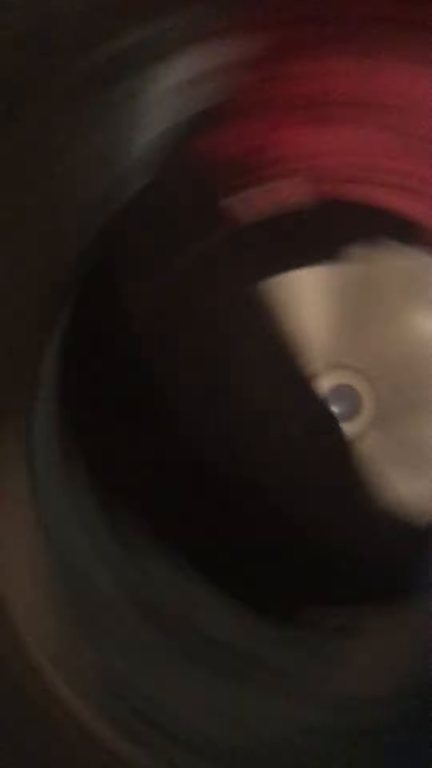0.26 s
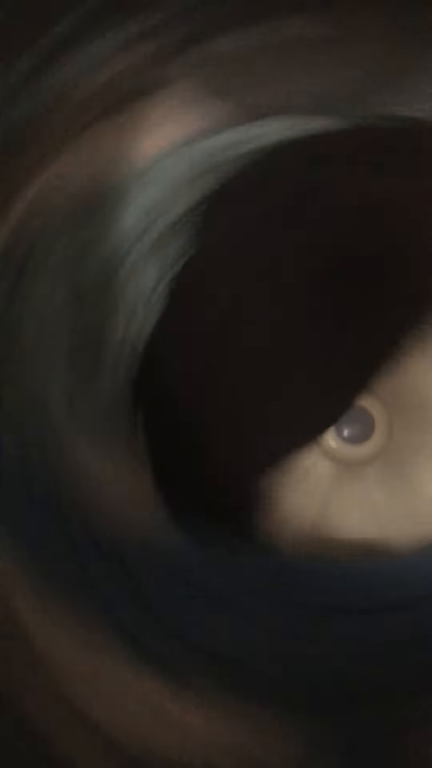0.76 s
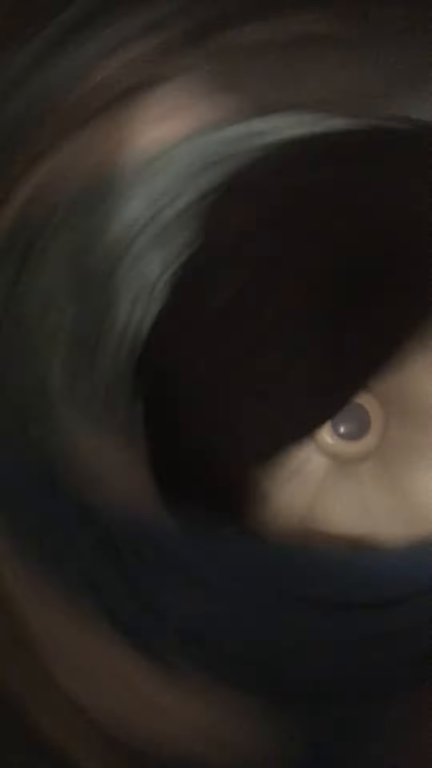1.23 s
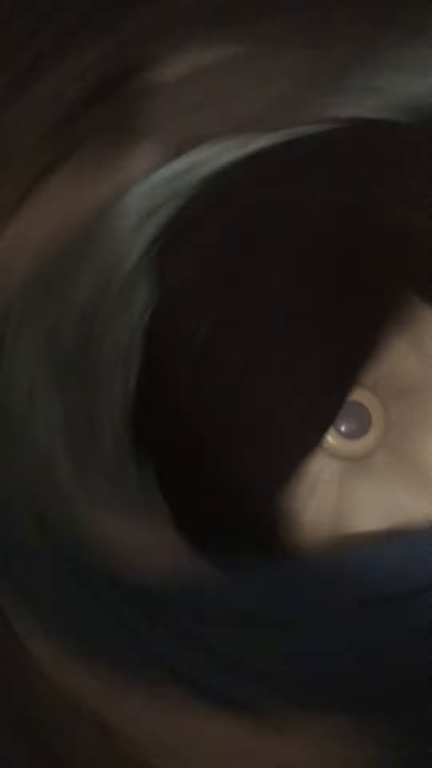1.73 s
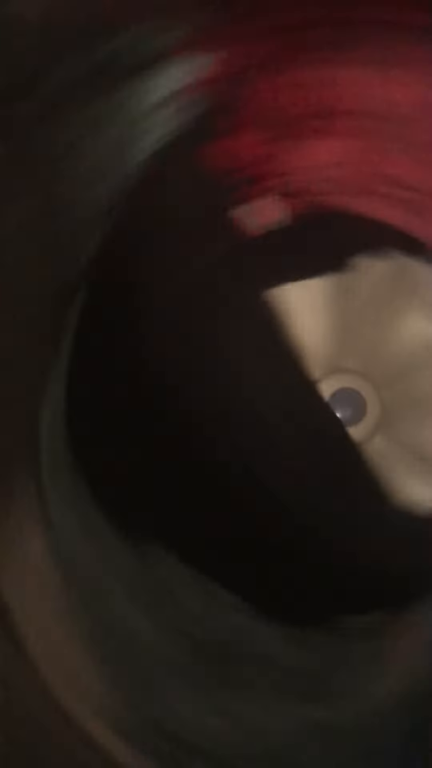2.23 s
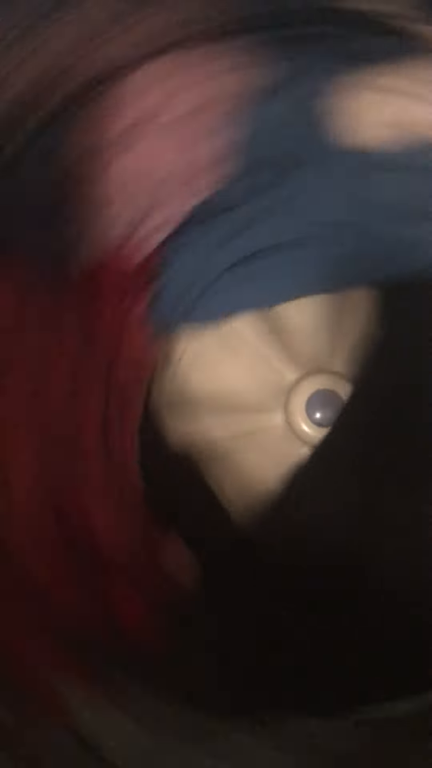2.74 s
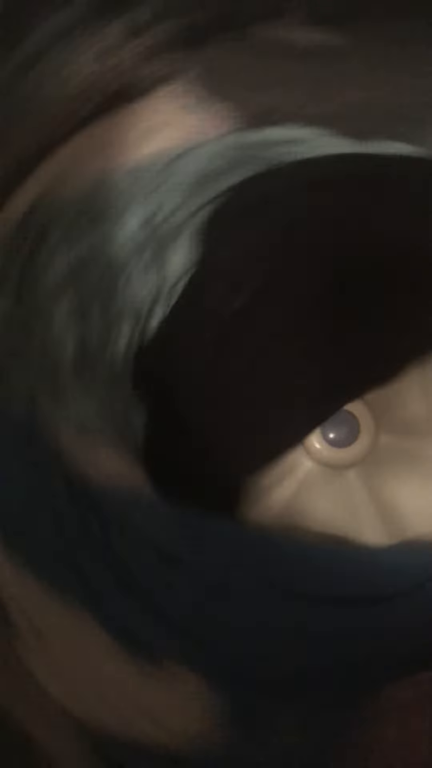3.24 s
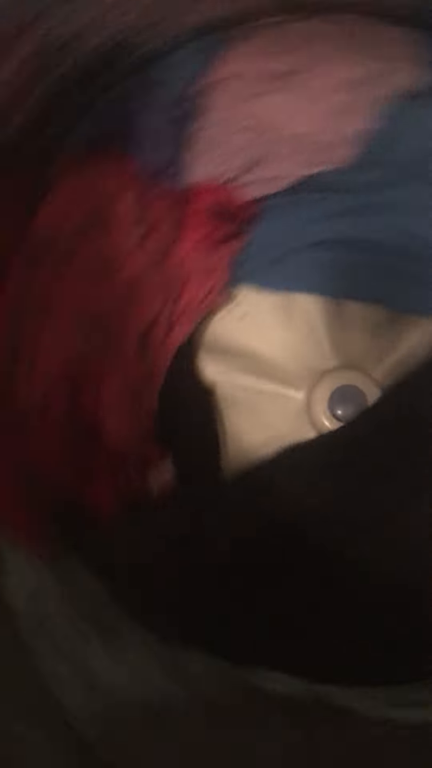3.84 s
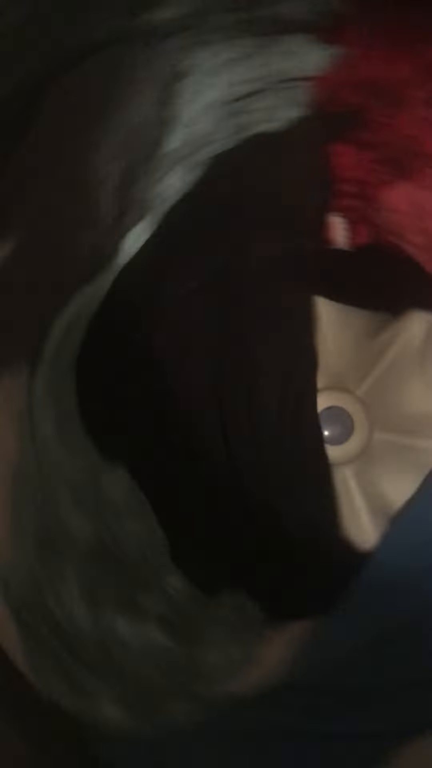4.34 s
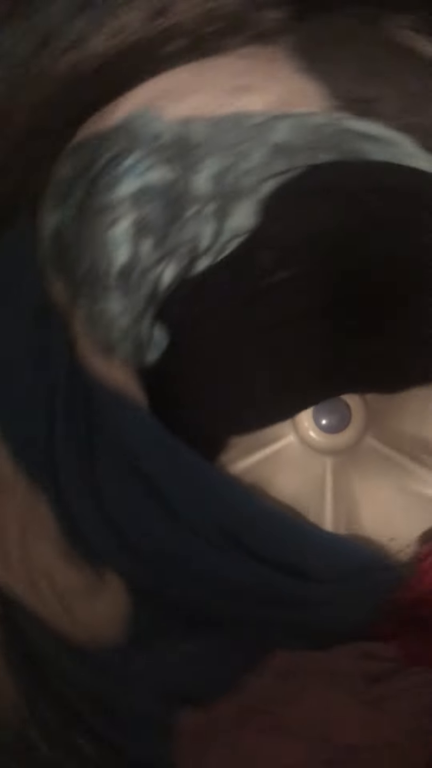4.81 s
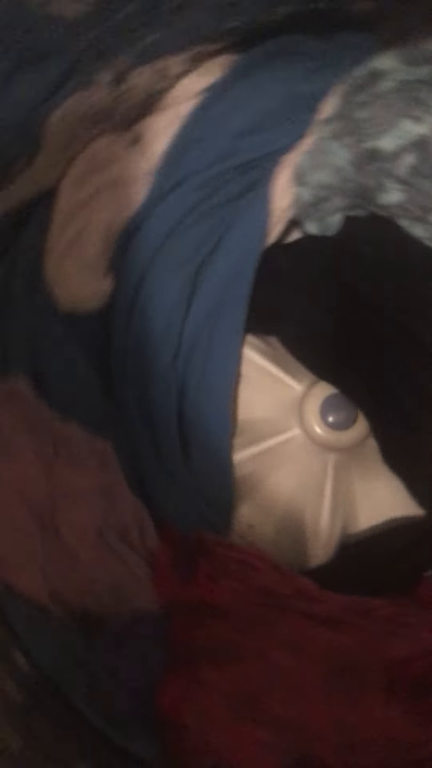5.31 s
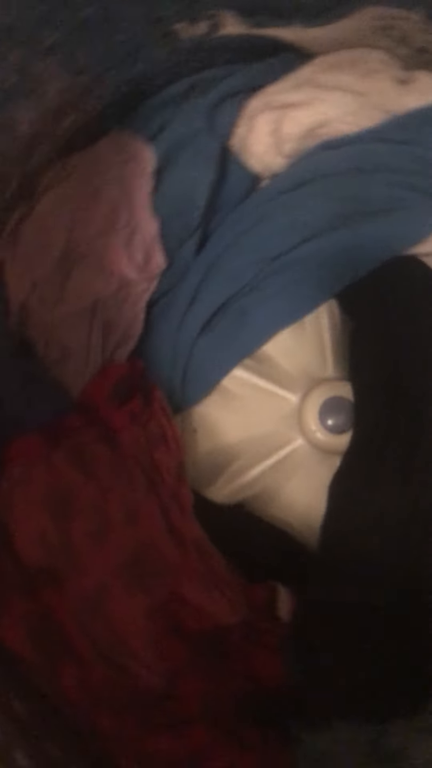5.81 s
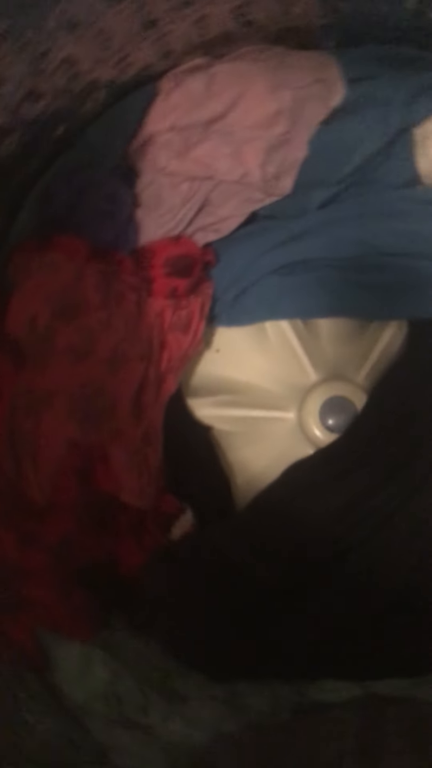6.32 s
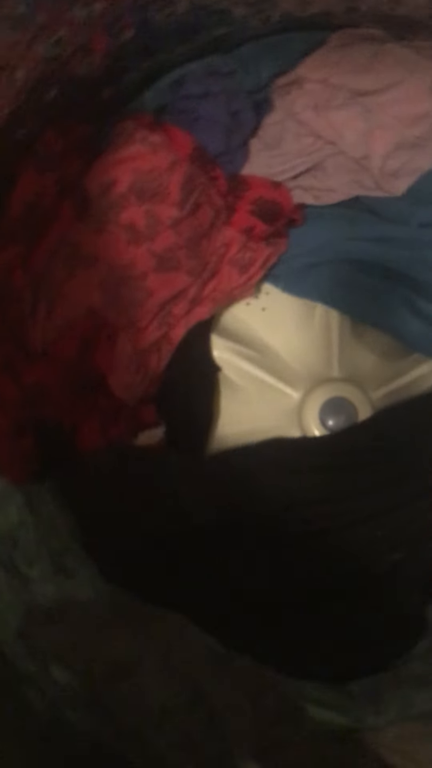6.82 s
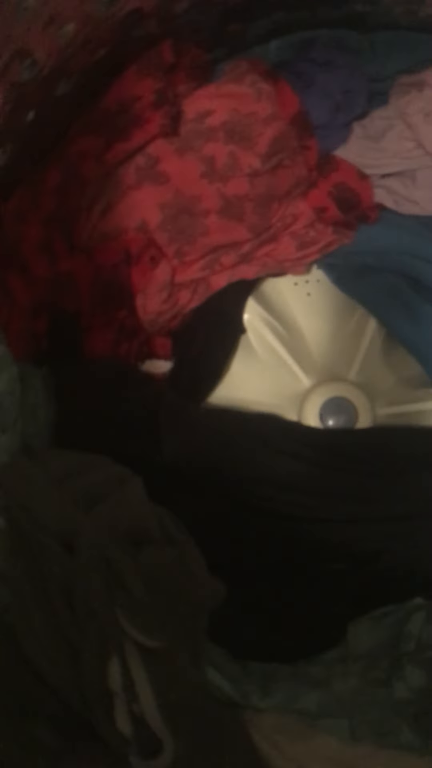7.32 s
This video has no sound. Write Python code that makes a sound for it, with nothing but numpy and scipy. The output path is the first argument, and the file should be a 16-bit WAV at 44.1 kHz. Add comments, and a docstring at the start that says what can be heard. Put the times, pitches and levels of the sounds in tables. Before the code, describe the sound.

Heard close up from inside a washing machine tub, a heavy wet load rumbles, booms and knocks against the drum, with button clicks and a brief hard clatter. A low drone wavers, then the motor tone sinks in pitch. Knocks become softer and sparser as the drum slows, until a steady, rapid, dull pump throb over mains hum stands out, with faint hiss.

```python
"""Washing-machine drum coasting down

Heard from inside the tub: wet laundry, as shaped noise, rumbles, rustles and drags less and less.
Short noise bursts ringing the tub's resonances are its knocks, clatters, clicks and taps. Two harmonics
make a low drone near the tub's 176 Hz resonance, then the motor's sinking tone. Damped cabinet modes make
the pump's steady thumps, fifteen a second, over a mains hum; they stand out at the end.
A faint noise hiss fades in early on."""
import sys
import numpy as np
from scipy import signal
from scipy.fft import rfft, irfft
from scipy.io import wavfile
from scipy.ndimage import uniform_filter1d

SR = 44100
rng = np.random.default_rng(int(sys.argv[2]) if len(sys.argv) > 2 else 0)


def dump(signal):
    """Clip the signal to [-1, 1] and save it as 16-bit WAV at the path in sys.argv[1]."""
    limited = np.clip(np.atleast_2d(signal).T, -1, 1)
    pcm = np.round(limited * 32767).astype(np.int16)
    wavfile.write(sys.argv[1], SR, pcm)


N = 333396
TIME = np.arange(N) / SR  # s

# the turning load, before the offsets below: (time [s], rumble [dB], rustle [dB])
LOAD_LEVELS = [(0, -44.5, -62), (0.14, -44.5, -70.5), (0.25, -38.5, -62), (0.75, -42, -68),
               (1.15, -47.5, -58.5), (1.4, -45, -73), (1.7, -52, -67.5), (2.15, -54.5, -61),
               (2.65, -55, -66.5), (3.2, -59, -65), (3.6, -54, -68), (4.2, -62, -65), (4.9, -60, -69),
               (5.15, -67.5, -71.5), (5.45, -61, -78), (5.85, -69.5, -69), (7.56, -66, -76.5)]
# the weight of the load shifts and the tub heaves: (start [s], peak level [dB])
LOAD_HEAVES = [(0.51, -37.5), (0.6, -45), (0.71, -38), (0.89, -43.5), (1.12, -37.5), (1.36, -46),
               (1.52, -52), (2.65, -56), (2.95, -64), (3.44, -64)]
# relative spectra of sway, rumble and rustle: (frequency [Hz], density [dB per Hz])
SWAY_SPECTRUM = [(15, -29.5), (30, -23), (45, -7), (64, 3.5), (90, 0.5), (130, -36), (300, -83)]
RUMBLE_SPECTRUM = [(50, -21), (100, -6), (170, -2), (260, -2), (400, -9), (600, -11.5), (760, -20),
                   (1200, -24.5), (2000, -35.5), (4000, -66)]
RUSTLE_SPECTRUM = [(300, -13), (800, 10.5), (1300, -10.5), (2200, 6.5), (3200, -1), (4200, -5.5),
                   (5000, -14), (7000, -18), (9000, -70), (16000, -20)]
# laundry striking the tub; boom and knock are before fixed offsets:
# (time [s], knock [dB], boom [dB], clack [dB], knock centre [Hz])
LAUNDRY_BLOWS = [(0.135, -24, -29.5, -36.5, 430), (0.226, -17.5, -24, -35.5, 434),
                 (0.258, -22, -29, -58, 313), (0.364, -36, -23, -71, 302), (0.437, -20.5, -33, -53, 301),
                 (0.598, -31, -24.5, -41.5, 355), (0.734, -14.5, -20, -58, 395),
                 (0.889, -33, -27, -54, 410), (1.096, -26, -19, -42.5, 564), (1.126, -30, -31, -47, 301),
                 (1.322, -26, -26, -53, 588), (1.719, -54, -36.5, -59, 603), (1.777, -47, -46, -43.5, 333),
                 (1.899, -53, -49, -54.5, 339), (2.019, -50, -39.5, -41, 659),
                 (2.118, -29, -38, -52.5, 520), (2.354, -34, -44, -58, 342), (2.71, -37, -39.5, -58.5, 350),
                 (2.785, -31, -41, -60, 544), (2.876, -33.5, -55, -73, 570), (3.091, -34.5, -56, -57, 356),
                 (3.293, -33, -46, -64.5, 605), (3.442, -28.5, -52, -60, 504),
                 (3.513, -48, -40, -56.5, 600), (3.629, -27, -36, -54, 547),
                 (3.738, -30.5, -60, -59.5, 595), (4.066, -33.5, -52, -57.5, 390),
                 (4.176, -31, -48, -65, 535), (4.283, -33, -58, -60, 600), (4.574, -31, -64, -70, 513),
                 (4.729, -36, -64, -60.5, 335), (4.776, -42, -49, -54.5, 328), (4.845, -50, -39, -80, 615),
                 (5.321, -36, -39, -56.5, 305)]
# hard parts clattering: (time [s], level [dB], swell [s], centre [Hz])
HARD_PART_CLATTERS = [(0.228, -40.5, 0.0079, 2670), (2.015, -40, 0.013, 1820)]
# buttons and zips ticking on the drum: (time [s], level [dB], centre [Hz], bandwidth [octaves])
BUTTON_CLICKS = [(0.135, -53, 2900, 0.53), (0.226, -28.5, 3300, 0.45), (0.229, -30.5, 1940, 0.3),
                 (0.409, -56, 3000, 0.33), (0.436, -46.5, 3020, 0.099), (0.598, -45.5, 1580, 0.4),
                 (0.615, -50.5, 3270, 0.46), (0.701, -55, 2960, 0.4), (1.026, -42, 1510, 0.32),
                 (1.065, -50, 1495, 0.19), (1.104, -53.5, 1730, 2.6), (1.131, -49.5, 2600, 0.76),
                 (1.331, -49.5, 2370, 0.27), (1.907, -60.5, 5040, 0.69), (3.034, -63, 1964, 0.78),
                 (3.92, -62, 1890, 1.3), (3.989, -60, 1820, 0.64), (4.943, -54.5, 1984, 1.3),
                 (4.955, -55, 2070, 1.2)]
# cloth dragging along the wall: (start [s], length [s], level [dB], centre [Hz])
CLOTH_DRAGS = [(0.558, 0.13, -56.5, 2180), (0.853, 0.12, -61.5, 2250), (0.996, 0.098, -54.5, 2010),
               (1.077, 0.032, -65, 4100), (1.231, 0.068, -47, 1680), (1.263, 0.091, -63.5, 3170),
               (1.28, 0.027, -72, 5800), (1.446, 0.059, -53, 2130), (1.496, 0.1, -62, 2230),
               (1.759, 0.065, -59.5, 2490), (1.875, 0.078, -52, 2300), (3.509, 0.044, -61, 2880),
               (3.95, 0.11, -63, 1680), (5.678, 0.29, -70, 3170), (6.191, 0.028, -68.5, 3200),
               (6.693, 0.029, -64.5, 3240)]
# resonances of the tub: (frequency [Hz], width [Hz], peak over the direct sound [dB])
TUB_RESONANCES = [(66, 16, 5), (128, 22, 3), (176, 24, 7), (290, 20, 1), (326, 30, 1), (434, 27, -1),
                  (565, 40, -1), (615, 30, 1), (925, 45, 4), (1182, 40, 3), (1550, 50, 0), (1894, 55, 5),
                  (1973, 25, 2), (2984, 45, 4), (3241, 45, 5), (3463, 55, 5), (3644, 50, 2)]
# a low drone near the tub's 176 Hz resonance, then the motor's sinking tone, before random surges:
# (time [s], pitch [Hz], level [dB])
DRONE_THEN_MOTOR = [(0, 190, -50), (0.6, 179.2, -43), (1.35, 174.9, -43.5), (1.55, 150.1, -75),
                    (1.85, 123.5, -51), (2.2, 116.4, -50), (2.7, 98, -64), (3.0, 86, -63.5),
                    (4.0, 55.8, -86)]
# modes of the cabinet rung by the pump: (frequency [Hz], relative level [dB], t60 [s])
CABINET_MODES = [(219.7, -47.5, 0.15), (268.6, -50, 0.065), (323, -56.5, 0.26), (364.2, -61, 0.45),
                 (450.2, -29, 0.069), (449.4, -28, 0.055), (549.5, -52.5, 0.15), (607.6, -52.5, 0.2),
                 (673.7, -55, 0.24), (735, -60, 0.26), (810, -64.5, 0.16), (910, -63, 0.1)]
# each thump of the pump and its rebounds: (delay [s], signed strength [ratio])
THUMP_REBOUNDS = [(0, 1), (0.00438, -0.43), (0.01005, 0.47)]
# relative spectrum of the hiss: (frequency [Hz], density [dB per Hz])
HISS_SPECTRUM = [(100, -11.5), (3000, 7.5), (5200, -4.5), (6600, 0), (7900, -4), (9500, 1.5), (10000, -0.5),
                 (10350, -5), (11000, -1), (16000, -0.5)]
# the hiss fades in: (time [s], level [dB])
HISS_FADE = [(0, -94), (0.3, -86), (0.6, -70), (0.9, -69), (7.56, -70)]

SWAY_DB, RUMBLE_DB, RUSTLE_DB = -9.5, 4, -1.5  # offsets; the sway is set against the rumble column
SWAY_WANDER_DB = 4  # rms
HEAVE_S, HEAVE_SKEW = 0.13, 0.74  # skew under 1: swells faster than it fades
# base contact time when clack and knock columns are equal; every HALVING_DB less clack halves it
SCRAPE_S, HALVING_DB = 0.0076, 25
KNOCK_T60_S, CLACK_T60_S = 0.25, 0.23
CLACK_HZ, CLACK_EDGE_DB = 1130, -5  # reference pitch; bright edge against the clack
CLATTER_TREBLE_DB = -22.5  # the spray of treble, against the body of the clatter
CLICK_TAIL_DB, DRIER_DB_PER_OCTAVE = -18.5, -8  # the broader a click, the less it rings on
DRAG_OCTAVES, DRAG_GRAIN_DB, DRAG_SNAPS_PER_S, DRAG_SKEW = 1.05, 3.5, 4600, 0.63
TICKS_PER_S, TICK_DB, TICK_SPREAD_DB = 18, -1.5, 3.5  # level over the rustle; spread either way
TICK_LOW_HZ, TICK_HIGH_HZ = 900, 2900
TICK_CALM_DB, TICK_GROWTH = -56, 0.45  # dB louder for each dB of rumble above the calm level
THUMP_HZ, THUMP_PHASE_S, MAINS_HZ = 14.998, 0.0465, 60  # phase: a thump falls at this time
EDGE_HZ = 15780  # upper limit of the whole sound


def amp(db):
    """Logarithmic level: decibels to amplitude ratio."""
    return 10 ** (np.asarray(db) / 20)


def unit(x):
    """Normalisation by mean power: scales to rms 1."""
    return x / np.sqrt(np.mean(x ** 2) + 1e-20)


def curves(rows):
    """Linear interpolation: each column of a timed table, sample by sample."""
    s, *columns = np.transpose(rows)
    return [np.interp(TIME, s, column) for column in columns]


def add(mix, s, sound):
    """Superposition: lays a sound into the mix at time s, or at zero if s is negative."""
    part = mix[max(round(s * SR), 0):][:len(sound)]
    part += sound[:len(part)]


def band(x, lo_hz, hi_hz, order=2):
    """Causal band-pass filtering with a Butterworth response."""
    sos = signal.butter(order, [lo_hz, hi_hz], "band", fs=SR, output="sos")
    return signal.sosfilt(sos, x)


def coloured(x, points):
    """Spectral shaping: weights the Fourier spectrum along a smooth curve."""
    hz, db = np.transpose(points)
    bins_hz = np.fft.rfftfreq(N, 1 / SR)
    gain = amp(np.interp(np.log(bins_hz + 1), np.log(hz), db))
    return irfft(rfft(x) * gain, N)


def drift(rate_hz):
    """Slow random fluctuation: noise under a Gaussian low-pass, of rms 1."""
    lowpass = np.exp(-(np.fft.rfftfreq(N, 1 / SR) / rate_hz) ** 2)
    return unit(irfft(rfft(rng.standard_normal(N)) * lowpass, N))


def swell(length_s, skew):
    """Amplitude envelope: one smooth rise and fall, 1 at its top."""
    phase = np.linspace(0, 1, max(round(length_s * SR), 2))
    return np.sin(np.pi * phase ** skew)


def tub_response():
    """Modal resonance: an impulse of direct sound plus the decaying modes of the tub."""
    t = np.arange(SR // 4) / SR
    ring = np.zeros(len(t))
    for hz, width, db in TUB_RESONANCES:
        decay = np.exp(-np.pi * width * t)
        # scaled by width so that the peak gain is the level listed
        ring += amp(db) * 2 * np.pi * width / SR * decay * np.cos(2 * np.pi * hz * t)
    return ring + (t == 0)


def blow(tub, lo_hz, hi_hz, contact_s, tail_db, t60, order=2, rattle_db=0):
    """Impact excitation: a noisy contact force and its scattered tail ring the tub; peak rms 1."""
    t = np.arange(len(tub)) / SR
    u = t / contact_s
    push = u * np.exp(1 - u)
    tail = amp(tail_db - 60 * t / t60) * (1 - np.exp(-u))
    # loose parts chatter, so the force comes in uneven jolts a few milliseconds long
    jolts = amp(rattle_db * unit(uniform_filter1d(rng.standard_normal(len(t)), size=150)))
    force = (push + tail) * jolts * rng.standard_normal(len(t))
    sound = signal.fftconvolve(band(force, lo_hz, hi_hz, order), tub)[:len(t)]
    peak_power = uniform_filter1d(sound ** 2, size=880).max()  # over 20 ms
    return sound / np.sqrt(peak_power)


def load_levels():
    """Level envelopes: sway, rumble and rustle settle with the load; each heave swells the sway."""
    rumble_db, rustle_db = curves(LOAD_LEVELS)
    heaves = np.zeros(N)
    for s, db in LOAD_HEAVES:
        add(heaves, s, amp(db) * swell(HEAVE_S, HEAVE_SKEW))
    sway = amp(rumble_db + SWAY_DB + SWAY_WANDER_DB * drift(3.4))
    return np.hypot(sway, heaves), amp(rumble_db + RUMBLE_DB), amp(rustle_db + RUSTLE_DB)


def cloth_folds():
    """Granular friction: each fold scrapes as random snaps in its own band, in loud and soft clumps."""
    folds = np.zeros(N)
    # more uneven under a heavy load
    unevenness_db = np.interp(curves(LOAD_LEVELS)[0], [-66, -44], [1.4, 3.3])
    edges = np.geomspace(500, 15000, num=12)
    for lo_hz, hi_hz in zip(edges, edges[1:]):
        snaps = rng.standard_normal(N) * (rng.random(N) < 1800 / SR)
        size_db = unevenness_db * (drift(24) + np.minimum(rng.exponential(1, N), 4))
        folds += band(snaps * amp(size_db), lo_hz, hi_hz)
    return coloured(folds, RUSTLE_SPECTRUM)


def laundry(tub):
    """Random excitation: the load sways, rolls round in soft lumps and rubs the resonant wall."""
    sway_gain, rumble_gain, rustle_gain = load_levels()
    sway = unit(coloured(rng.standard_normal(N), SWAY_SPECTRUM))
    lump_db = 2.4 * drift(16)
    lumps = coloured(rng.standard_normal(N) * amp(lump_db), RUMBLE_SPECTRUM)
    rumble = unit(signal.fftconvolve(lumps, tub)[:N])
    rustle = unit(signal.fftconvolve(cloth_folds(), tub)[:N])
    return sway * sway_gain + rumble * rumble_gain + rustle * rustle_gain


def knocks(tub):
    """Soft-body impact: deep boom, hollow knock and bright clack; more clack, longer contact."""
    out = np.zeros(N)
    for s, knock_db, boom_db, clack_db, knock_hz in LAUNDRY_BLOWS:
        contact_s = SCRAPE_S * 2 ** ((clack_db - knock_db) / HALVING_DB)
        boom = blow(tub, 122.5, 219, contact_s * 3.43, tail_db=-24, t60=0.1)
        knock = blow(tub, knock_hz * 0.76, knock_hz * 1.232, contact_s * 1.5,
                     tail_db=-2.5, t60=KNOCK_T60_S)
        clack = blow(tub, CLACK_HZ * 0.34, CLACK_HZ * 1.37, contact_s * 0.74,
                     tail_db=6.5, t60=CLACK_T60_S, order=5, rattle_db=2)
        edge = blow(tub, 1310, 2900, contact_s * 0.38, tail_db=-4, t60=0.35, order=4)
        add(out, s, amp(boom_db - 8) * boom)
        add(out, s, amp(knock_db - 11.5) * knock)
        add(out, s, amp(clack_db) * clack)
        add(out, s, amp(clack_db + CLACK_EDGE_DB) * edge)
    return out


def clatters(tub):
    """Multiple impact: a grainy burst of hard contacts that reaches into the high treble."""
    out = np.zeros(N)
    for s, db, swell_s, hz in HARD_PART_CLATTERS:
        body = blow(tub, hz * 0.72, hz * 1.36, swell_s, tail_db=-5.5, t60=0.38, rattle_db=5.5)
        treble = blow(tub, 4400, 9200, swell_s, tail_db=-8, t60=0.3, order=1, rattle_db=4)
        add(out, s, amp(db) * body)
        add(out, s, amp(db + CLATTER_TREBLE_DB) * treble)
    return out


def clicks(tub):
    """Hard-body impact: very short contacts ring near the small part's pitch, with a thin bright tick."""
    out = np.zeros(N)
    for s, db, hz, octaves in BUTTON_CLICKS:
        half = 2 ** (octaves / 2)
        tail_db = CLICK_TAIL_DB + DRIER_DB_PER_OCTAVE * octaves
        body = blow(tub, hz / half, hz * half, 0.0018, tail_db=tail_db, t60=0.26, order=3)
        tick = blow(tub, 4800, 12000, 0.00085, tail_db=-9, t60=0.29)
        add(out, s, amp(db) * body)
        add(out, s, amp(db - 39.5) * tick)
    return out


def snaps_in_cloth(length, per_s, grain_db):
    """Stick-slip friction: a dense random run of tiny snaps of uneven size."""
    snaps = rng.standard_normal(length) * (rng.random(length) < per_s / SR)
    return snaps * amp(grain_db * np.minimum(rng.exponential(1, length), 4))


def drags(tub):
    """Sliding friction: a garment's swell of snaps, in its own range of pitch, rings the tub."""
    out = np.zeros(N)
    half = 2 ** (DRAG_OCTAVES / 2)
    for s, length_s, db, hz in CLOTH_DRAGS:
        snaps = snaps_in_cloth(SR // 2, DRAG_SNAPS_PER_S, DRAG_GRAIN_DB)
        grains = band(snaps, hz / half, hz * half)
        scrape = unit(signal.fftconvolve(grains, tub)[:SR // 2])
        shape = swell(length_s, DRAG_SKEW)
        add(out, s, amp(db) * shape * scrape[:len(shape)])
    return out


def ticks(tub):
    """Random impact: stray seams and hems tap at chance moments, harder while the load is heavy."""
    rumble_db, rustle_db = curves(LOAD_LEVELS)
    level_db = rustle_db + TICK_DB + TICK_GROWTH * (rumble_db - TICK_CALM_DB)
    out = np.zeros(N)
    for when, pitch, size in rng.random((round(TICKS_PER_S * N / SR), 3)):
        hz = TICK_LOW_HZ * (TICK_HIGH_HZ / TICK_LOW_HZ) ** pitch
        db = level_db[int(when * N)] + TICK_SPREAD_DB * (2 * size - 1)
        tap = blow(tub, hz / 1.4, hz * 1.38, 0.0015, tail_db=-16.5, t60=0.15, order=4)
        add(out, when * N / SR, amp(db) * tap)
    return out


def drone_then_motor():
    """Harmonic tone: a wavering low drone near a tub resonance, then the motor's sinking tone."""
    hz, db = curves(DRONE_THEN_MOTOR)
    phase = 2 * np.pi * np.cumsum(hz * (1 + 0.0024 * drift(3.2))) / SR
    surge_db = 3 * drift(7)
    return amp(db + surge_db) * unit(np.sin(phase) + amp(-10) * np.sin(2 * phase))


def pump():
    """Periodic modal excitation: the pump's steady dull thumps ring the cabinet."""
    t = np.arange(SR // 3) / SR
    ring = np.zeros(len(t))
    for k, (hz, db, t60) in enumerate(CABINET_MODES):
        sense = (-1) ** k  # neighbouring panel modes swing in opposite senses
        ring += sense * amp(db - 60 * t / t60) * np.cos(2 * np.pi * hz * t)
    thump = np.zeros(len(t))
    for delay, strength in THUMP_REBOUNDS:
        add(thump, delay, strength * band(ring, 132, 767, order=4))
    out = np.zeros(N)
    # the first start is before zero, so that thump is laid at zero
    starts = np.arange(THUMP_PHASE_S - 1 / THUMP_HZ, N / SR, 1 / THUMP_HZ)
    for s, chance in zip(starts, rng.standard_normal(len(starts))):
        add(out, s, amp(1.5 + 0.5 * chance) * thump)
    return out


def mains_hum():
    """Electromagnetic vibration: a steady pure tone at twice the mains frequency."""
    return amp(-61.5) * unit(np.sin(2 * np.pi * 2 * MAINS_HZ * TIME))


def hiss():
    """Stationary random noise: a faint microphone hiss, shaped in spectrum and faded in."""
    noise = unit(coloured(rng.standard_normal(N), HISS_SPECTRUM))
    return amp(curves(HISS_FADE)[0]) * noise


def scene():
    """Linear superposition of every source, as heard from inside the tub."""
    tub = tub_response()
    load = laundry(tub) + knocks(tub) + clatters(tub) + clicks(tub) + drags(tub) + ticks(tub)
    return (load + drone_then_motor() + pump() + mains_hum() + hiss())[None]


def record(dry):
    """Band limitation: a linear-phase low-pass removes the highest treble."""
    lowpass = signal.firwin(1023, EDGE_HZ, window=("kaiser", 9), fs=SR)
    return signal.oaconvolve(dry, lowpass[None], "same")


dry = scene()
out = record(dry)
dump(out)
```